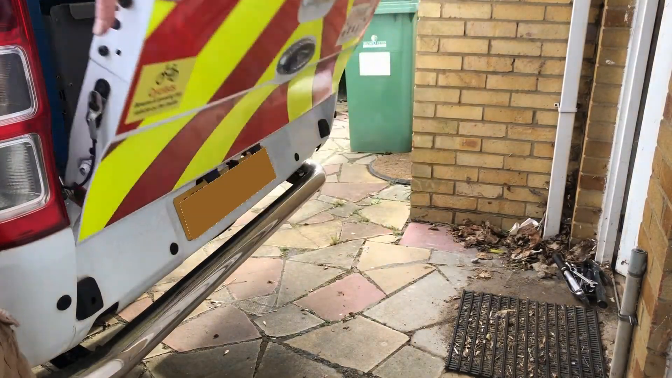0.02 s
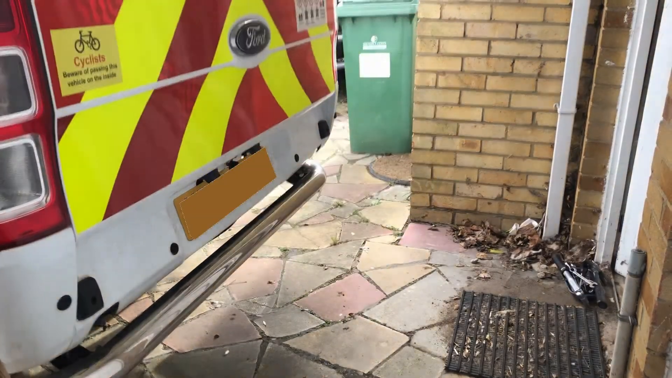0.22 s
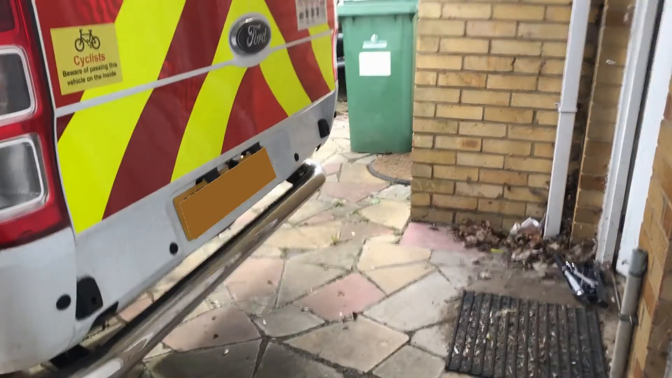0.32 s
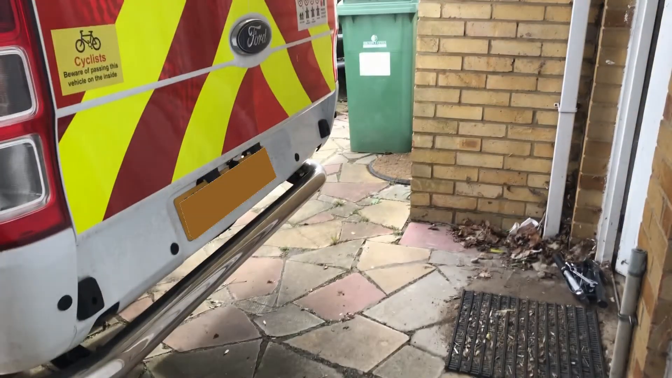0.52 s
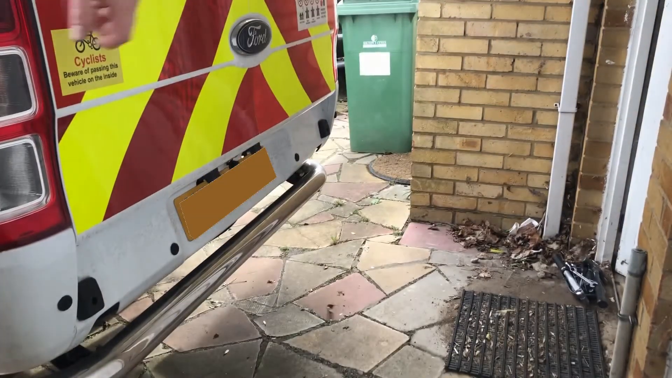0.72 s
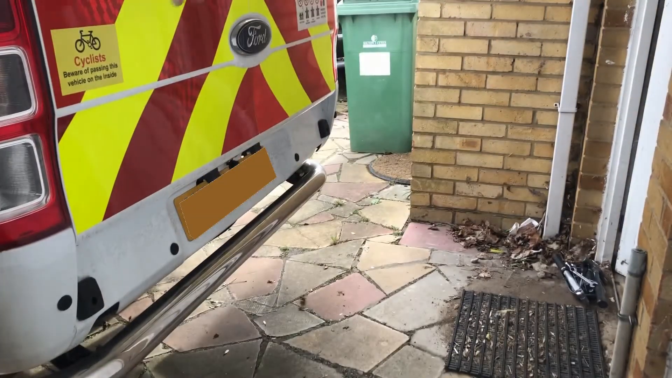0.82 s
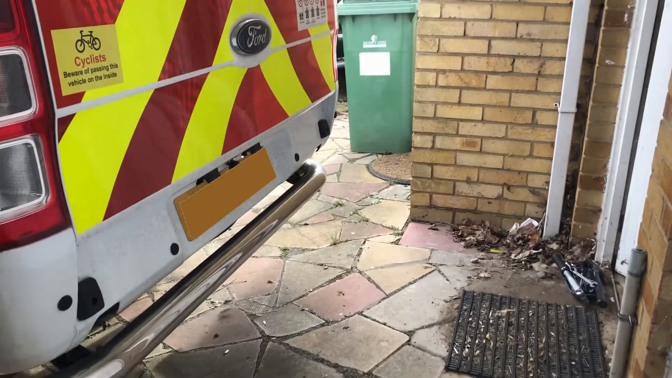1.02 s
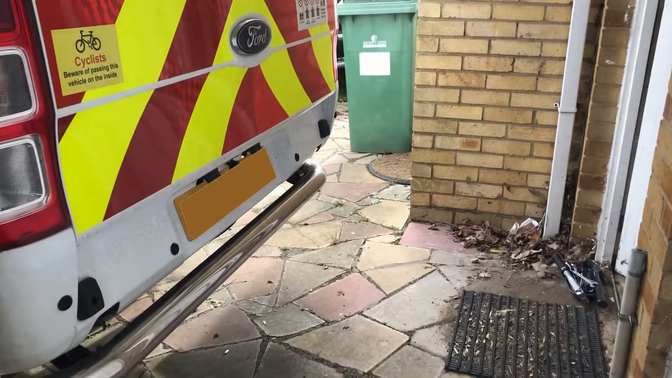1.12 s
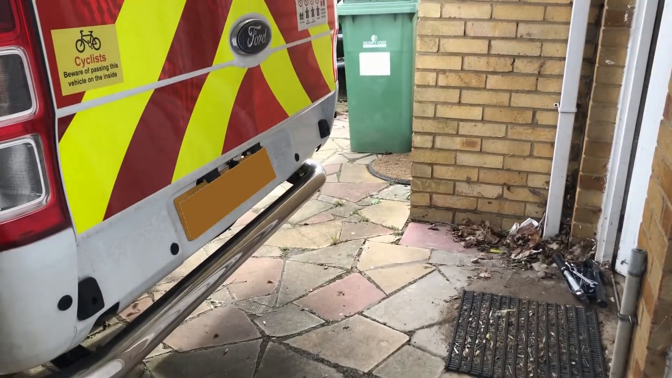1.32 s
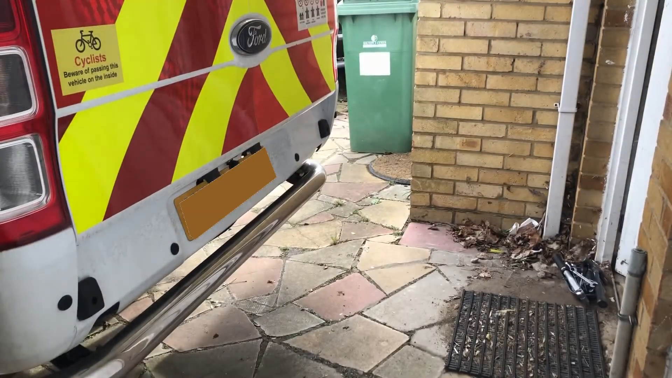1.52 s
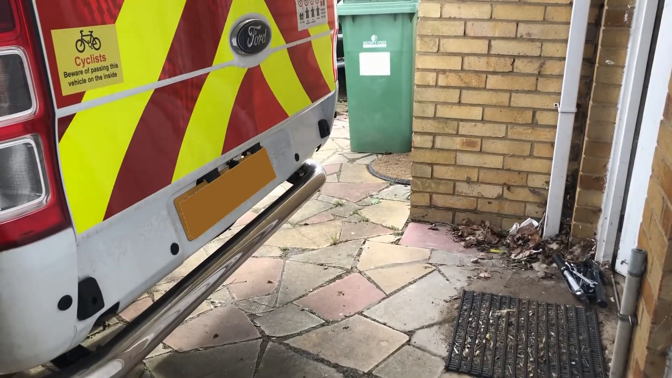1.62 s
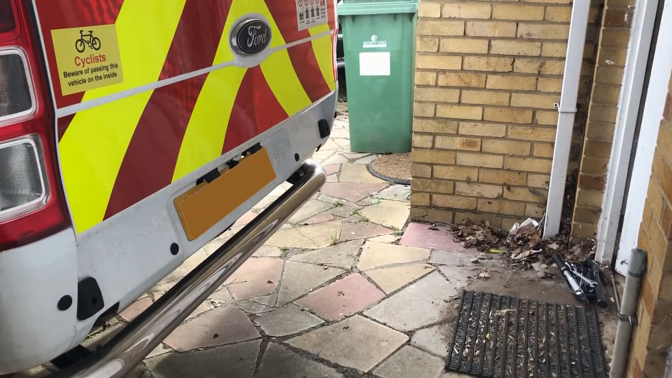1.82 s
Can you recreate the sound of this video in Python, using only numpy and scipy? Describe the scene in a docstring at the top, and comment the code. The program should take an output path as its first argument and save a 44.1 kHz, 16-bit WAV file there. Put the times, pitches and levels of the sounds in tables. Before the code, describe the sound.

Close outdoor take of one loud metal tailgate slam, latches cracking just before the low panel boom and rattle, short dull reflections off brick walls, then quiet scuffs, a soft knock and low background rumble.

```python
"""Tailgate slam in a walled yard

A pickup's steel tailgate is swung shut in a paved yard between brick walls.
Latches snap as struck resonators with chattering noise; the panel booms in modes under banded clatter.
The load bed's air adds a low sagging sine, and the walls return dull echoes and a diffuse tail.
Near the microphone, shaped noise makes rustling clothes, scuffing shoes and faint knocks;
a low outdoor rumble of wavering noise lies behind it all."""
import sys
import numpy as np
from scipy import signal
from scipy.fft import rfft, irfft
from scipy.io import wavfile

SR = 44100
rng = np.random.default_rng(int(sys.argv[2]) if len(sys.argv) > 2 else 0)


def output_pcm(signal):
    """Save a mono or channel-first signal as 16-bit PCM at the path in sys.argv[1].

    Samples are clipped to [-1, 1] before scaling.
    """
    pcm = np.clip(np.atleast_2d(signal).T, -1, 1) * 32767
    wavfile.write(sys.argv[1], SR, np.round(pcm).astype(np.int16))


N = 83790  # samples, 1.9 s

BAND_EDGES = np.geomspace(22, 17000, 29)  # Hz, about a third of an octave apart
METAL_RIPPLE_DB, RIPPLE_HZ = 2, 29.99  # unevenness of crowded metal modes; spacing of any ripple


def from_db(db):
    """Decibels to gain."""
    return 10 ** (np.asarray(db) / 20)


def rms_one(x):
    """Scale to unit power."""
    return x / np.sqrt(np.mean(x ** 2) + 1e-20)


def since(s):
    """Seconds elapsed since s, zero before it."""
    return np.maximum(np.arange(N) / SR - s, 0)


def envelope(s, rise, t60):
    """Straight rise from time s, then an exponential fade of 60 dB in t60 seconds."""
    swell = np.minimum(since(s) / rise, 1)
    return swell * np.exp(-np.log(1000) * since(s + rise) / t60)


def drift(rate):
    """Random wander through `rate` points a second, with a spread of about one."""
    return np.interp(np.arange(N) / SR * rate, np.arange(N), rng.standard_normal(N))


def roll_off(ratio):
    """Gain of a steep slope that sets in where a frequency ratio passes one."""
    return 1 / np.sqrt(1 + ratio ** 6)


def band_pass(x, low_hz, high_hz, order=1):
    """Keep what lies between two frequencies."""
    return signal.sosfilt(signal.butter(order, [low_hz, high_hz], "band", fs=SR, output="sos"), x)


def noise_bank(ripple_db=0):
    """Third-octave bands of noise, each of unit power; ripple gives it many narrow resonances."""
    size = 2 * N
    hz = np.arange(N + 1) * SR / size
    ripple = np.interp(hz / RIPPLE_HZ, np.arange(N), rng.standard_normal(N))
    spectra = rfft(rng.standard_normal((2, size))) * from_db(ripple_db * ripple)
    white = irfft(spectra)[:, :N + SR // 2]  # the extra half second lets the filters settle
    bands = []
    for k, (low, high) in enumerate(zip(BAND_EDGES, BAND_EDGES[1:])):
        # two noises take turns, so that neighbouring bands are unrelated
        bands.append(rms_one(band_pass(white[k % 2], low, high, order=2)[-N:]))
    return np.array(bands)


def per_band(table, index=1):
    """A column of a frequency table, read at the band centres."""
    table = np.array(table)
    log_centres = np.log(BAND_EDGES[1:] * BAND_EDGES[:-1]) / 2
    return np.interp(log_centres, np.log(table[:, 0]), table[:, index])


def colour(table, tilt_db=0):
    """Band gains of a spectrum tilted by so many dB per octave, with unit total power."""
    density = from_db(per_band(table) + tilt_db * np.log2(BAND_EDGES[1:]))
    gains = density * np.sqrt(np.diff(BAND_EDGES))
    return gains / np.linalg.norm(gains)


def strike(times, levels, modes, reach):
    """Each hit sets decaying resonators ringing, as far as it reaches their pitch."""
    spread_db = 1  # every hit excites every mode a little differently
    chance = rng.standard_normal((len(times), len(modes)))
    out = 0
    for k, (hz, mode_db, t60) in enumerate(modes):
        clicks = np.full(N, 1e-18)  # inaudible floor
        strengths = from_db(levels + mode_db + spread_db * chance[:, k]) * reach(hz)
        clicks[(times * SR).astype(int)] = strengths
        radius = np.exp(-np.log(1000) / (t60 * SR))
        angle = 2 * np.pi * hz / SR
        poles = [1, -2 * radius * np.cos(angle), radius ** 2]
        out = out + signal.lfilter([0, np.sin(angle)], poles, clicks) * (-1) ** k
    return out


def latches():
    """Steel jaws meet their pins: a crack, damped modes that chatter on, a few that sing, a dense tail."""
    # latch strikes: t/s, level/dB, ringing tail level/dB, treble tilt/(dB per octave), brightest f/Hz
    latch_hits = [(.1957, -13, -27, -4, 7200), (.239, -6, -20, -7, 16000), (0.2508, -12.5, -18, -3, 16300),
                  (0.26, -10, -20.5, 5.5, 16000), (0.277, -43, -26.5, -6, 14000)]
    # resonances of the latch steel: f/Hz, level/dB, t60/s
    latch_modes = [(3000, -12, .018), (4300, -15, .012), (6100, -12, .018), (6420, -11, .02),
                   (10100, -10, .01), (1290, -20, .15), (2452, -26, .22), (5549, -29, .2), (8004, -29, .2),
                   (12387, -34, .5), (13100, -2, .011), (13550, -3, .012)]
    # dense ringing of the latch and its bracket: f/Hz, level/(dB per Hz)
    tail_colour = [(300, -33), (1300, -5.5), (3000, -4), (4300, -6), (6300, 4), (8000, 4.5), (11000, 2.5),
                   (15000, 2)]
    low_hz, tail_t60_s = 330, .17
    crack_db, crack_s = -2, 0.002  # level relative to the strike, decay time constant
    chatter_db, chatter_t60_s = -4.5, 0.13
    damped_t60_s = .06  # modes that die sooner than this chatter, the others sing

    times, levels, _, _, tops = np.transpose(latch_hits)
    damped = [mode for mode in latch_modes if mode[2] < damped_t60_s]
    singing = [mode for mode in latch_modes if mode[2] >= damped_t60_s]
    ring = strike(times, levels, damped, lambda hz: roll_off(hz / tops))
    sing = strike(times, levels, singing, lambda hz: roll_off(hz / tops))
    chatter = rng.standard_normal(N) * envelope(0, 0.0071, chatter_t60_s)
    chatter = chatter / np.linalg.norm(chatter)
    out = ring + sing + from_db(chatter_db) * signal.fftconvolve(ring, chatter)[:N]

    bank, white = noise_bank(METAL_RIPPLE_DB), rng.standard_normal(N)
    for s, db, tail_db, tilt_db, top_hz in latch_hits:
        crack = white * (since(s) > 0) * np.exp(-since(s) / crack_s)
        out += from_db(db + crack_db) * band_pass(crack, low_hz, top_hz)
        gains = colour(tail_colour, tilt_db)
        gains = gains * roll_off(BAND_EDGES[:-1] / top_hz) * roll_off(low_hz / BAND_EDGES[1:])
        out += from_db(tail_db) * envelope(s, 0.0015, tail_t60_s) * (gains @ bank)
    return out


def gate():
    """The panel lands and rebounds: low modes boom under a clatter that dies band by band."""
    # blows on the body: t/s, boom level/dB, clatter level/dB, clatter tilt/(dB per octave), lowest f/Hz
    blows = [(.199, -21, -34, -2.5, 340), (.2255, -22.5, -29.5, -0.5, 329.4), (.2565, -12, -13.5, -1, 397),
             (0.2738, -19, -11, -1, 71.2), (.2855, -8, -15, -3, 70), (.329, -17, -24, 0, 60),
             (.3435, -8, -24, -2, 140), (.3695, -12, -33, -3, 130), (1.29, -42.5, -56, -3.5, 90)]
    # resonances of gate and load bed: f/Hz, level/dB, t60/s
    panel_modes = [(53.6, -25.5, .6), (83, -25, 0.25), (108.4, -16.5, 0.86), (128.3, -4, .3),
                   (146.8, -7, 0.2), (172, -1, .27), (245, -11, .8), (414, -12, .2), (187.1, -15, 0.4),
                   (224.3, -14.5, 0.34), (307.7, -19, 0.43), (334.4, -21.5, 0.44), (440, -14, 0.23),
                   (564, -15, 0.16), (605.6, -17.5, 0.24), (774, -24.5, 0.17), (844, -24.5, 0.14),
                   (892, -28, 0.25)]
    # crowded sheet-metal modes: f/Hz, level/(dB per Hz), t60/s
    clatter = [(60, -7, .5), (170, -5, .45), (400, 0, .33), (800, -2, .3), (1500, -7, .35),
               (3000, -13, .36), (7000, -19, .36), (15000, -27, .33)]
    attack_s = 0.0011

    times, booms, _, _, lows = np.transpose(blows)
    out = strike(times, booms, panel_modes, lambda hz: roll_off(lows / hz))
    gains = np.array([from_db(db) * colour(clatter, tilt_db) * roll_off(low_hz / BAND_EDGES[1:])
                      for _, _, db, tilt_db, low_hz in blows])
    fades = per_band(clatter, index=2)
    for band, t60, strengths in zip(noise_bank(METAL_RIPPLE_DB), fades, gains.T):
        # the blows share one noise, so their powers add
        power = sum((g * envelope(s, attack_s, t60)) ** 2 for g, s in zip(strengths, times))
        out += band * np.sqrt(power)
    return out


def thump():
    """The air squeezed in the load bed swells, sags in pitch and rings very low."""
    start_s, level_db, swell_s, t60_s = .26, -9, 0.044, 0.38
    final_hz = 37.9
    sag_hz, sag_s = 20, 0.039  # the pitch starts this much higher while the gate still presses
    t = since(start_s)
    cycles = final_hz * t + sag_hz * sag_s * (1 - np.exp(-t / sag_s))
    return from_db(level_db) * envelope(start_s, swell_s, t60_s) * np.sin(2 * np.pi * cycles)


def swing():
    """Hinge friction stirs the hollow gate from before it lands: rippled noise that slowly fades."""
    # rumble of the hinges: f/Hz, level/(dB per Hz)
    hinge_colour = [(100, -20), (220, -7), (420, -1), (800, -5.5), (1500, -14.5), (4000, -28)]
    start_s, level_db, rise_s, t60_s = 0.078, -40.5, 0.066, 1
    rumble = colour(hinge_colour) @ noise_bank(METAL_RIPPLE_DB)
    return from_db(level_db) * envelope(start_s, rise_s, t60_s) * rumble


def walls(x):
    """A few dull echoes off the brickwork."""
    # wall echoes: delay t/s, level/dB
    echoes = [(.0175, -18), (.029, -18), (.058, -18)]
    dull = band_pass(x, 250, 1700)
    return sum(from_db(db) * np.pad(dull, (int(delay * SR), 0))[:N] for delay, db in echoes)


def yard(x):
    """Dull, diffuse reverberation of the yard: the sound smeared by fading noise."""
    level_db, t60_s = -20.5, 0.98
    tail = rng.standard_normal(N) * envelope(0.012, 0.027, t60_s)
    tail = band_pass(tail / np.linalg.norm(tail), 150, 1300)
    return from_db(level_db) * signal.fftconvolve(x, tail)[:N]


def knocks():
    """Light, dull knocks: bursts of noise that die quickly."""
    # faint knocks: t/s, level/dB
    knock_times = [(0.9, -34), (0.918, -57), (1.188, -47)]
    # their colour: f/Hz, level/(dB per Hz)
    knock_colour = [(100, -3.5), (250, -9.5), (390, 0.5), (650, -8.5), (1400, -13), (3000, -21),
                    (9000, -37)]
    t60_s = 0.18
    bursts = sum(from_db(db) * envelope(s, 0.0043, t60_s) for s, db in knock_times)
    return (colour(knock_colour) @ noise_bank()) * bursts


def rustles():
    """Short rubs of cloth and soles close by: grainy friction noise that swells and fades."""
    # rustles and scuffs: start t/s, level/dB, rise t/s, fade t60/s, treble tilt/(dB per octave)
    rubs = [(-.03, -46.5, 0.016, 0.47, -4.5), (0.012, -38.5, 0.0027, 0.19, 0.5),
            (0.051, -33, 0.015, 0.25, 1.5), (.07, -36, 0.012, 0.61, -1), (0.569, -55.5, .008, 0.7, -2.5),
            (0.621, -55, 0.029, 0.89, -4.5), (0.803, -54, 0.0038, 0.31, 2.5), (.905, -43, 0.026, 0.22, 0.5),
            (.99, -58.5, 0.039, 1, 4.5), (1.089, -50.5, 0.031, 0.43, -6.5), (1.16, -46, 0.074, 0.24, -0.5),
            (1.41, -48, 0.013, 0.23, 3), (1.473, -46, 0.018, 0.21, 1.5), (1.54, -58, 0.022, 0.15, 3),
            (1.647, -48.5, 0.03, 0.22, 0.5), (1.78, -61.5, 0.015, 0.29, -0.5)]
    # their colour: f/Hz, level/(dB per Hz)
    rub_colour = [(300, -42), (1200, -8), (2500, 0.5), (4000, 1), (5800, 2.5), (8500, -1), (11500, -4.5),
                  (15000, -7)]
    grain_db, grains_per_s = 1.5, 860
    gains = np.array([from_db(db) * colour(rub_colour, tilt_db) for _, db, _, _, tilt_db in rubs])
    strokes = np.array([envelope(s, rise, t60) for s, _, rise, t60, _ in rubs])
    band_levels = np.sqrt(gains.T ** 2 @ strokes ** 2)
    friction = (noise_bank(ripple_db=3.5) * band_levels).sum(axis=0)
    return friction * from_db(grain_db * drift(grains_per_s))


def air():
    """Low outdoor rumble: coloured noise whose level gently wavers."""
    # outdoor background: f/Hz, level/(dB per Hz)
    air_colour = [(25, -10.5), (50, -4), (85, 0), (130, -4), (200, -5), (290, -9.5), (420, -12.5),
                  (1000, -20), (2500, -30), (6000, -39), (15000, -43.5)]
    level_db, waver_db, wavers_per_s = -47, 0.72, 6.73
    return from_db(level_db + waver_db * drift(wavers_per_s)) * (colour(air_colour) @ noise_bank())


def scene():
    """The swing, the slam with its echoes, small movements and the background."""
    slam = latches() + gate()
    slam_in_yard = slam + walls(slam) + yard(slam)
    return (slam_in_yard + thump() + swing() + knocks() + rustles() + air())[None]


def record(dry):
    """Peaks are rounded off; the deepest rumble and the top are cut."""
    ceiling, rumble_cut_hz, top_cut_hz = 1, 22, 15850
    rounded = ceiling * np.tanh(dry / ceiling)
    trimmed = signal.sosfilt(signal.butter(2, rumble_cut_hz, "high", fs=SR, output="sos"), rounded)
    return signal.sosfilt(signal.ellip(10, .1, 80, top_cut_hz, fs=SR, output="sos"), trimmed)


dry = scene()
out = record(dry)
output_pcm(out)
```